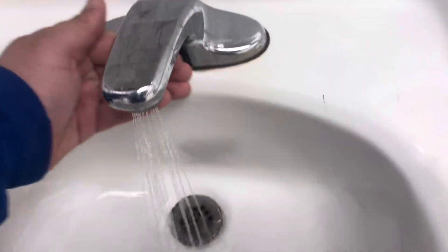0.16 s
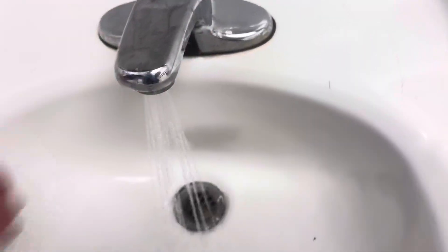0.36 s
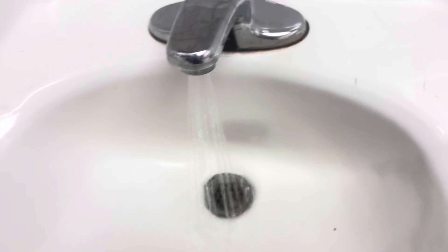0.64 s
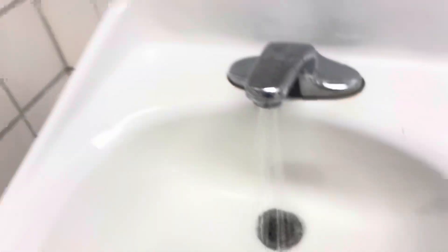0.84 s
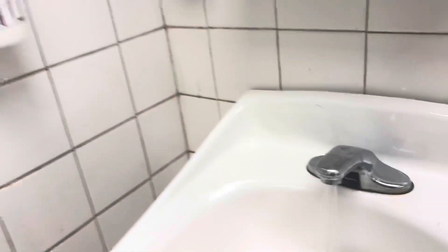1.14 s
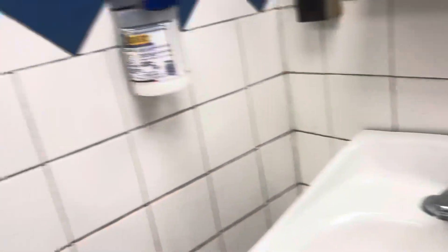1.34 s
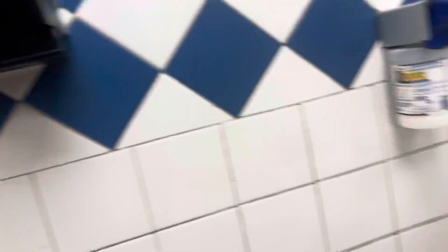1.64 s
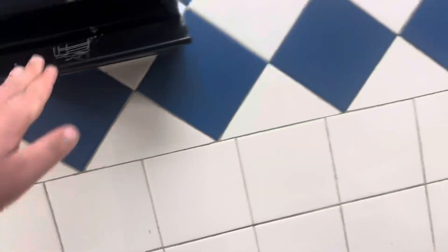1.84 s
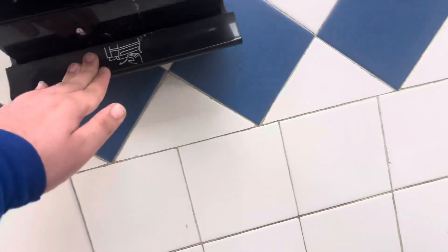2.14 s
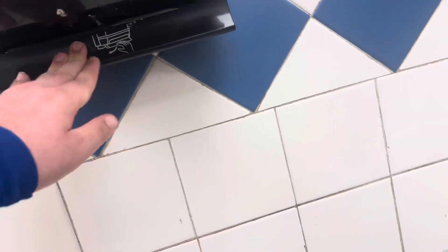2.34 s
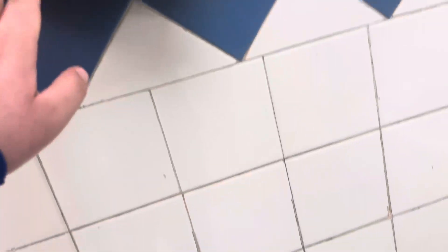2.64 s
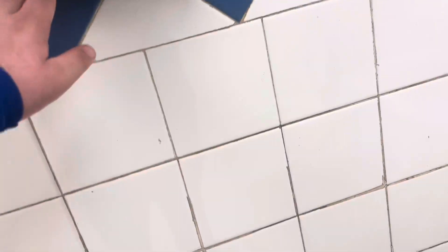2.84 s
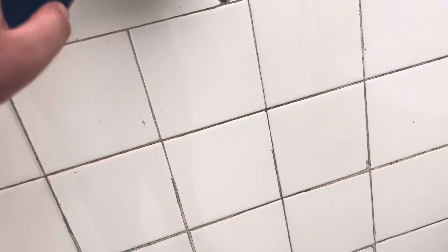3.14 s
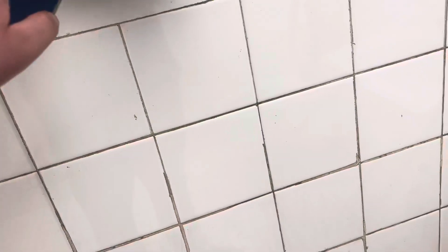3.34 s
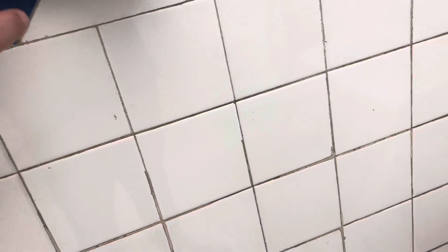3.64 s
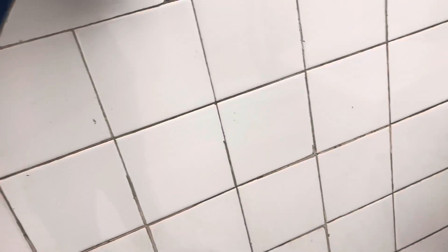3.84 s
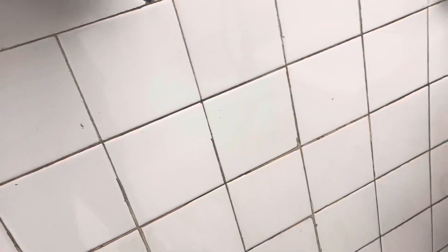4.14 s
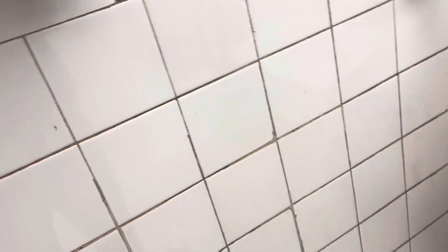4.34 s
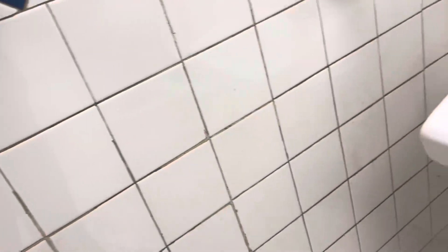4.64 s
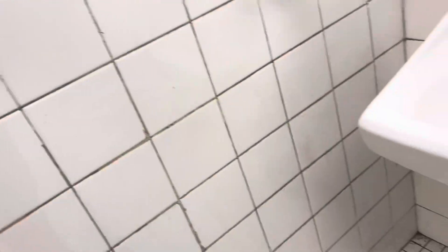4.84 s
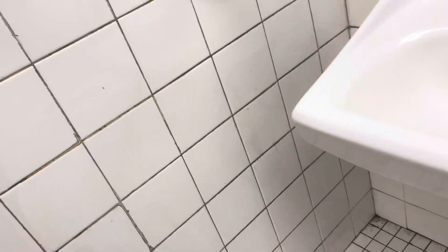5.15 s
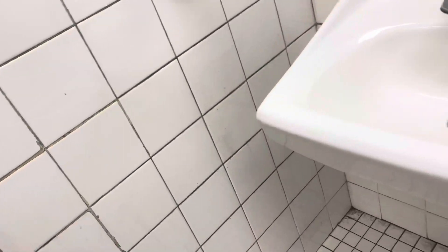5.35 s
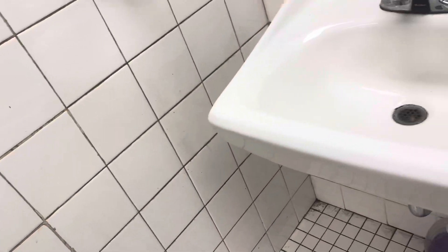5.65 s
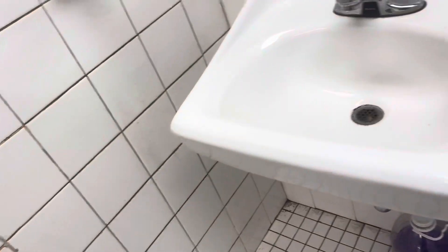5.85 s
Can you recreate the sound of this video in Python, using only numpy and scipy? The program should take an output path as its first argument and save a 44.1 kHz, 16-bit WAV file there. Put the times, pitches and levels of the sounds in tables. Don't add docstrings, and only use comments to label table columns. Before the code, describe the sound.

In a small tiled washroom, tap water hisses and gurgles away, a hollow dispenser clatters and rumbles, then a paper towel is snapped off.

```python
import sys
import numpy as np
from scipy import signal
from scipy.fft import rfft, irfft, next_fast_len
from scipy.io import wavfile
from scipy.ndimage import uniform_filter1d

SR = 44100
rng = np.random.default_rng(int(sys.argv[2]) if len(sys.argv) > 2 else 0)


def volts(x):
    e = np.asarray(x, float) / 20
    return 10 ** e


def unload_audio(sound):
    columns = np.transpose(np.atleast_2d(sound))
    steps = np.round(np.clip(columns, -1, 1) * 32767)
    wavfile.write(sys.argv[1], SR, steps.astype(np.int16))


N = 264159


def evened(x):
    return x / np.sqrt(np.mean(x ** 2) + 1e-20)


def read(points, hz):
    f, value = np.transpose(points)
    return np.interp(np.log(hz + 1), np.log(f + 1), value)


def follow(rows, t):
    s, db, *rest = np.transpose(rows)
    level_db = np.interp(t, s, db, left=-120, right=-120)
    return [level_db] + [np.interp(t, s, column) for column in rest]


def add(mix, s, sound):
    part = mix[round(s * SR):][:len(sound)]
    part += sound[:len(part)]


def hiss(rows, colour, lo_hz, hi_hz, patchy_db, flicker_db, size):
    hop = size // 4
    frames = N // hop + 5
    hz = np.fft.rfftfreq(size, 1 / SR)
    db, *tilt = follow(rows, np.arange(frames) * hop / SR)
    brightness = tilt[0] if tilt else 0 * db
    field = read(colour, hz)[:, None] + np.log2((hz[:, None] + 50) / 4000) * brightness
    band = (hz >= lo_hz) & (hz <= hi_hz)
    field -= 10 * np.log10((volts(field[band]) ** 2).sum(0))
    patches = uniform_filter1d(rng.standard_normal((frames, len(hz))), 12, 0)
    patches = evened(uniform_filter1d(patches, 5, 1)).T
    flicker = evened(uniform_filter1d(rng.standard_normal(frames), size=2))
    z = rng.standard_normal((frames, len(hz), 2, 2)).T
    z = (z[0] + 1j * z[1]) * volts(field + db + patchy_db * patches + flicker_db * flicker)
    noise = signal.istft(z, nperseg=size, noverlap=size - hop)[1][:, :N]
    return noise / np.sqrt(.75)


def ring(modes, events, churn, churn_hz, spread_db):
    s, db, pitch = np.transpose(events)
    luck = rng.standard_normal((len(s), len(modes)))
    out = np.zeros(N)
    for k, (hz, width, mode_db) in enumerate(modes):
        r = np.exp(-np.pi * width / SR)
        w = 2 * np.pi * hz / SR
        drive = churn * np.sqrt(1 - r) * volts(-spread_db * abs(np.log2(hz / churn_hz)))
        blow_db = db - spread_db * abs(np.log2(hz / pitch)) + 1.92 * luck[:, k]
        blow = volts(blow_db) * np.sign(luck[:, -1 - k])
        np.add.at(drive, (s * SR).astype(int), blow)
        out += volts(mode_db) * signal.lfilter([np.sin(w)], [1, -2 * r * np.cos(w), r * r], drive)
    return out


def clicks(per_s, spread_db):
    hits = rng.standard_normal(N) * (rng.random(N) < per_s / SR)
    return evened(hits * volts(spread_db * np.minimum(rng.exponential(1, N), 4)))


def burst(db, colour_db, t60):
    t = np.arange(8192) / SR
    hz = np.fft.rfftfreq(len(t), 1 / SR)
    noise = irfft(rfft(rng.standard_normal(len(t))) * volts(colour_db(hz + 50)))
    rise = np.minimum(t / 0.00057, 1)
    return evened(noise) * volts(db - 60 * t / max(t60, .003)) * rise


def dispenser():
    # (frequency [Hz], width [Hz], level [dB])
    casing = [(90, 14, -15.5), (154, 14, -10), (190, 15, -13), (237, 18.7, -1.5), (293.6, 21, -3),
              (356, 20, -7), (386.5, 18, -3.5), (444, 21.4, -3), (524.4, 22, -6.5), (574, 22.5, -2.5),
              (642, 24, -2.5), (730, 28, -10), (872, 43, -6.5), (1033, 45, -5.5), (1430, 93, -6),
              (1574, 33, -8), (1994, 46, -8.5), (2450, 80, -9.5), (2640, 54, -8)]
    # (time [s], level [dB], favoured pitch [Hz])
    roll = [(1.9, -58, 453), (1.94, -26.5, 465), (1.97, -34.5, 440), (2.04, -38, 241), (2.06, -27, 240),
            (2.18, -26.5, 254), (2.28, -33.5, 222), (2.43, -44.5, 276), (2.46, -31.5, 261),
            (2.59, -39.5, 236), (2.67, -41, 264), (2.72, -38, 465), (2.78, -19.5, 428), (2.83, -24, 460),
            (2.88, -24, 347), (2.92, -18.5, 443), (2.96, -29, 408), (3.0, -21, 265), (3.25, -40.5, 224),
            (3.28, -28, 246), (3.34, -24.5, 257), (3.36, -17, 280), (3.43, -19, 385), (3.46, -9, 362),
            (3.55, -22.5, 270), (3.63, -26.5, 298), (3.75, -25, 245), (4.04, -44.5, 211), (4.06, -32, 190),
            (4.13, -54, 248), (4.15, -19, 255), (4.2, -26.5, 195), (4.27, -43, 231), (4.47, -43, 168),
            (4.5, -70, 180)]
    # (time [s], crack [dB], thud [dB], thud pitch [Hz], crack tilt [dB per octave], crack time to -60 dB [s])
    knocks = [(1.931, -21, -41, 899, -7.5, 0.033), (1.931, -34.5, -29.5, 595, -5.5, 0.04),
              (2.0529, -26.5, -27.5, 240, -8, 0.059), (2.1243, -28.5, -32, 252, -3.1, 0.032),
              (2.2654, -35.5, -33.5, 237, -4.5, 0.034), (2.4537, -49.5, -34.5, 270, 1.5, 0.04),
              (2.481, -40, -35, 266, -1, 0.027), (2.673, -43, -36.5, 272, -6, 0.04),
              (2.7453, -28.5, -21.5, 480, -5.5, 0.04), (2.772, -21, -17, 447, -4.5, 0.027),
              (2.7932, -17.5, -15, 460, -2.5, 0.037), (2.806, -9.5, -12, 460, -5.5, 0.044),
              (3.2605, -36, -31.5, 225, -6, 0.055), (3.3561, -21.5, -20.5, 242, -10, 0.06),
              (3.3918, -18, -20, 441, -8.5, 0.063), (3.4374, -17.5, -18.5, 600, -8.5, 0.032),
              (3.4523, -15, -14.5, 258, -6, 0.05), (3.4773, -20, -16, 380, -8.5, 0.058),
              (3.6268, -36, -29, 360, -8.5, 0.048), (3.8491, -42.5, -37, 273, -6, 0.028),
              (4.0162, -45, -41, 137, -4.5, 0.04), (4.143, -25, -30, 244, -11, 0.058),
              (4.557, -44, -42, 151, -4, 0.04), (4.652, -47, -48.5, 196, -2.5, 0.035),
              (4.8817, -49, -50, 237, -3.1, 0.04)]
    db, hz = follow(roll, np.arange(N) / SR)
    thuds = [(s, thud_db + 2.6, pitch) for s, _, thud_db, pitch, *_ in knocks]
    rumble = volts(db - 6.5) * clicks(500, 3.5)
    out = ring(casing, thuds, rumble, hz, spread_db=8.5)
    for s, crack_db, _, _, tilt, t60 in knocks:
        add(out, s, burst(crack_db, lambda f: tilt * np.log2(np.maximum(f, 700) / 3000), t60))
    return out


def drain():
    # (frequency [Hz], width [Hz], level [dB])
    pipe = [(262, 26, -4.5), (318, 27.4, -1), (427, 29, -4), (648, 19.4, -1.5), (1060, 32, -0.5),
            (1560, 32, 0), (1880, 30.4, -1.5)]
    # (time [s], peak level [dB], favoured pitch [Hz])
    glugs = [(0.249, -32.5, 1000), (0.374, -25.5, 673), (0.42, -36, 342), (0.456, -25.5, 665),
             (0.499, -26, 655), (0.548, -30, 256), (0.559, -21.5, 256), (0.619, -25.5, 673),
             (0.749, -31.5, 1070), (0.789, -34, 641), (0.888, -35, 1000), (0.923, -23.5, 630),
             (0.969, -38, 1060), (1.089, -31.5, 416), (1.12, -28.5, 412), (1.169, -39, 1060),
             (1.269, -31.5, 428), (1.318, -32, 423), (1.372, -39, 643), (1.422, -27.5, 630),
             (1.479, -31.5, 425), (1.596, -38.5, 304), (1.679, -33, 640), (1.825, -27.5, 436),
             (2.289, -34, 234), (2.409, -28.5, 277),
             (1.2892, -46, 1890),
        (1.429, -31, 1880),
        (1.48, -41, 1910),
        (1.5496, -43, 1870),
        (1.6807, -42.5, 1560),
        (2.2547, -42, 1540),
        (2.4055, -51, 1600),
    ]
    # (time [s], level [dB])
    gurgle = [(0.0, -36.5), (0.18, -41.5), (0.42, -42), (0.59, -33.5), (1.4, -44.5), (1.77, -38),
              (1.88, -36), (2.08, -41), (2.13, -32.5), (2.27, -37.5), (2.6, -36)]
    db, = follow(gurgle, np.arange(N) / SR)
    churn = volts(db - 6) * clicks(150, 4.0)
    return volts(-0.85) * ring(pipe, glugs, churn, 458, spread_db=13.5)


def spray():
    # (time [s], level [dB], brightness [dB per octave])
    spray_curve = [(0.0, -38.5, 0.16), (0.85, -40.5, -0.1), (1.02, -41, 0.7), (1.43, -43.5, 2.8),
                   (1.45, -41, -0.3), (1.49, -46.5, 3.2), (1.83, -49.5, 0), (1.92, -49, 0.3),
                   (1.93, -48, 1.1), (1.95, -52.5, 0.5), (2.02, -52, 2.8), (2.13, -48, -4.5),
                   (2.16, -53.5, 0.6), (2.23, -47.5, -4.2), (2.25, -49.5, -5.5), (2.3, -65, 1.5)]
    # (frequency [Hz], level [dB])
    spray_colour = [(150, -11), (500, -3.5), (1500, -8.5), (3000, -11), (4600, -7.5), (7000, -13),
                    (8500, -2), (10300, -14.5), (12000, 1), (14000, -9), (15400, -11.5), (16500, -60)]
    return hiss(spray_curve, spray_colour, 3000, 8000, patchy_db=1.5, flicker_db=0.63, size=256)


def snaps():
    # (time [s], level [dB], centre frequency [Hz], time to -60 dB [s])
    snap_events = [
        (4.9141, -19.5, 8700, 0.034),
        (4.9212, -15.5, 4200, 0.032),
        (4.9254, -20, 2000, 0.018),
        (5.3762, -36.5, 12200, 0.026),
        (5.4314, -25.5, 11900, 0.033),
        (5.5218, -15, 13400, 0.03),
        (5.544, -17.5, 12500, 0.027),
        (5.5996, -32, 1830, 0.022),
        (5.677, -45, 4130, 0.028),
    ]
    out = np.zeros(N)
    for s, db, hz, t60 in snap_events:
        add(out, s, burst(db - 6.0, lambda f: -7 * abs(np.log2(f / hz)), t60))
    return out


def paper():
    # (time [s], level [dB], brightness [dB per octave])
    paper_curve = [(1.9, -52.5, -2.5), (1.94, -49.5, -1.5), (2.01, -55.5, 4), (2.08, -49.5, -4.3),
                   (2.24, -46, 2), (2.32, -62, -2), (2.55, -55, -1.7), (2.62, -65, -1.5), (2.72, -56, 0),
                   (2.78, -32.5, -6), (2.79, -38.5, -2.5), (2.81, -24.5, -4.5), (2.87, -38, -8.5),
                   (2.95, -50, -4.7), (3.16, -56.5, -0.5), (3.23, -77.5, 4.5), (3.27, -52, -4.5),
                   (3.3, -55, -2.5), (3.35, -49.5, 2), (3.36, -34.5, -3.3), (3.38, -42.5, -5),
                   (3.39, -36.5, -4.3), (3.43, -48, -2), (3.46, -29.5, -3.7), (3.49, -42.5, -4.5),
                   (3.57, -52.5, -1.5), (3.86, -54.5, -3.3), (4.01, -81, 4), (4.03, -54, -1),
                   (4.08, -72, 3), (4.13, -62, -4), (4.14, -51, -3.2), (4.26, -68.5, 1.3), (4.34, -58, 2.3),
                   (4.49, -63.5, -1.7), (4.56, -56, 2.2), (4.62, -64, -0.5), (4.67, -59.5, 0.1),
                   (4.87, -72, -1.5), (4.88, -58, 0.1), (4.91, -65.5, -1.5), (4.92, -33, 1.1),
                   (4.93, -34.5, 1.4), (4.96, -50.5, 0.5), (5.19, -70.5, -2.2), (5.34, -74.5, 4.5),
                   (5.37, -58, 1.5), (5.43, -45, 2.8), (5.54, -40.5, 1), (5.6, -45, -1.2), (5.8, -76, -4.3),
                   (5.99, -71, 5)]
    # (frequency [Hz], level [dB])
    paper_colour = [(300, 2.5), (1000, -0.5), (2500, -3.5), (4500, -5.5), (6000, -10), (8500, -9),
                    (10500, -10.5), (12300, -5), (14000, -12), (15400, -16.5), (16500, -55.5)]
    return hiss(paper_curve, paper_colour, 2000, 8400, patchy_db=1.5, flicker_db=1.5, size=256)


def ventilation():
    # (time [s], level [dB])
    hum_curve = [(0.0, -47), (0.55, -49), (0.75, -43.5), (1.13, -48), (1.52, -55), (1.8, -44.5),
                 (1.93, -45.5), (2.29, -43), (2.52, -48.5), (2.75, -43), (2.92, -47), (3.25, -49),
                 (3.4, -42.5), (3.54, -41.5), (3.62, -37.5), (3.95, -43.5), (4.39, -43.5), (4.54, -47.5),
                 (5.41, -44.5), (5.62, -42), (5.99, -44.5)]
    # (frequency [Hz], level [dB])
    hum_colour = [(8.8, -35.5), (15, -14.5), (49, -1.5), (97, 1.5), (118, -18), (150, -5), (245, -16.5),
                  (334, -14), (582, -23), (776, -24), (1540, -36), (1970, -37.5), (3000, -44), (3900, -58),
                  (6600, -120)]
    return hiss(hum_curve, hum_colour, 25, 120, patchy_db=1.74, flicker_db=0.15, size=2048)


def tiles(x, wet_db):
    # (frequency [Hz], time to -60 dB [s])
    echo_times = [(100, 0.51), (400, .45), (1500, 0.38), (4000, 0.28), (9000, 0.18), (14000, .15)]
    taps = np.zeros((2, SR // 2))
    at = np.arange(200, SR // 2 - 20, 20)
    at = at + rng.integers(0, 20, (2, len(at)))
    np.put_along_axis(taps, at, rng.choice([-1., 1.], at.shape), 1)
    hz, t, z = signal.stft(taps, SR, nperseg=256)
    fade = volts(-60 * t / read(echo_times, hz)[:, None])
    tail = signal.istft(z * fade, SR, nperseg=256)[1]
    tail *= volts(wet_db) / np.linalg.norm(tail[0])
    scatter = rng.standard_normal(200) * volts(-np.arange(200) / 8)
    tail[0, 0] += 1
    tail[1, :200] += scatter / np.linalg.norm(scatter)
    return signal.fftconvolve(x[None], tail, axes=1)[:, :N]


def scene():
    hisses = spray() + paper() + ventilation()
    return hisses + tiles(drain(), -2) + tiles(dispenser(), -4.5) + tiles(snaps(), -10)


def band_limit(x):
    return signal.sosfilt(signal.butter(12, 15010, fs=SR, output="sos"), x)


def record(dry):
    # (frequency [Hz], lead of the right port [turns])
    port_lead = [(0, 0), (1100, 0), (1500, .3), (2600, -.03), (4500, -.03), (5600, .1), (6400, 0),
                 (7400, 0), (9600, .5), (10300, .5), (12000, 1), (13600, 1), (14800, 1.5), (22050, 1.5)]
    # (frequency [Hz], share of sound common to both ports [0-1])
    likeness = [(60, .96), (300, 0.79), (700, 0.53), (1300, 0.09), (2200, 0.54), (4000, 0.62), (5600, 0.62),
                (7000, 0.8), (8200, 0.83), (10000, 1), (11300, .75), (12800, 0.84), (14200, 0.9),
                (15300, .98)]
    # (frequency [Hz], left over right [dB])
    left_over_right = [(60, -0.5), (130, 2), (290, 2), (630, 2), (1380, -2.5), (3010, 1.0), (6590, 1.5),
                       (14400, -1)]
    size = next_fast_len(N)
    hz = np.fft.rfftfreq(size, 1 / SR)
    left, other = rfft(dry, size)
    same = np.clip(read(likeness, hz), 0, 1)
    turns = np.interp(hz, *np.transpose(port_lead))
    right = (same * left + np.sqrt(1 - same ** 2) * other) * np.exp(2j * np.pi * turns)
    lean = volts(read(left_over_right, hz) / 2)
    mix = irfft(np.array([left * lean, right / lean]), size)[:, :N]
    return band_limit(mix)


dry = scene()
out = record(dry)
unload_audio(out)
```